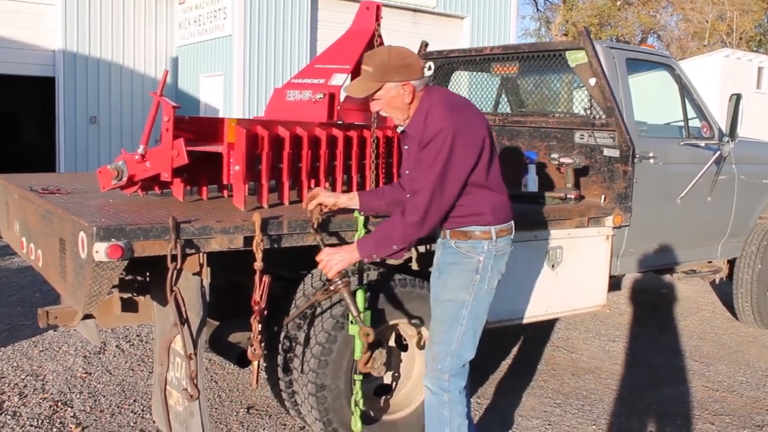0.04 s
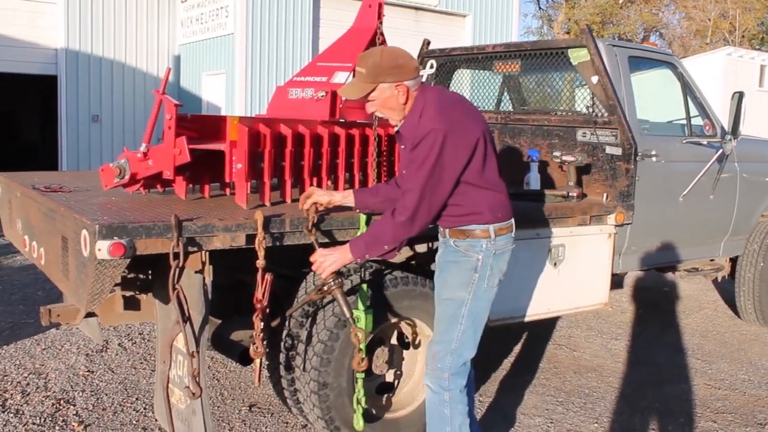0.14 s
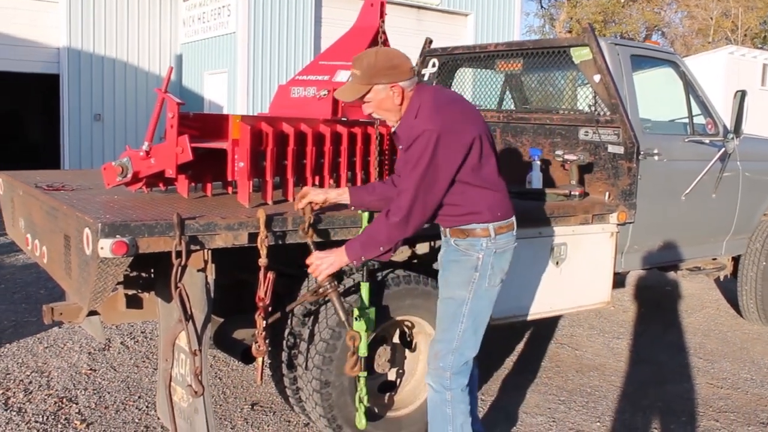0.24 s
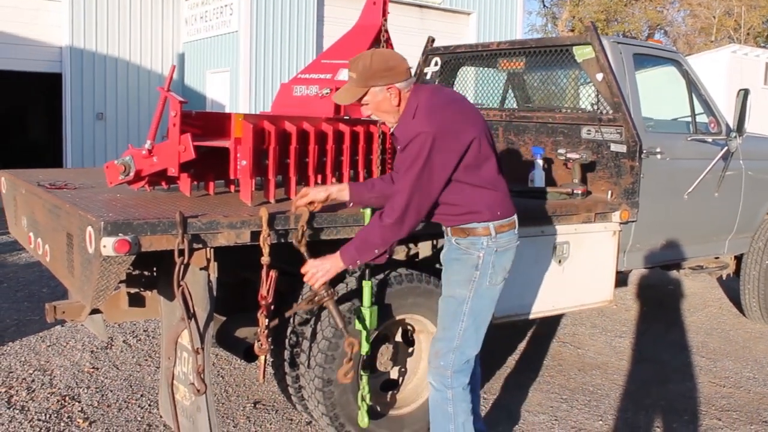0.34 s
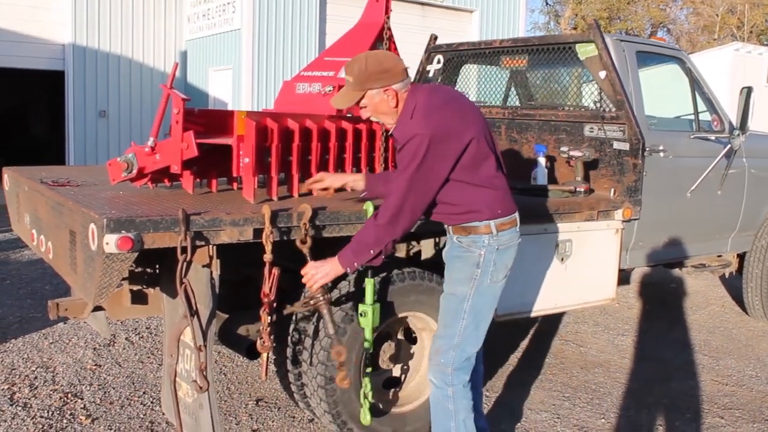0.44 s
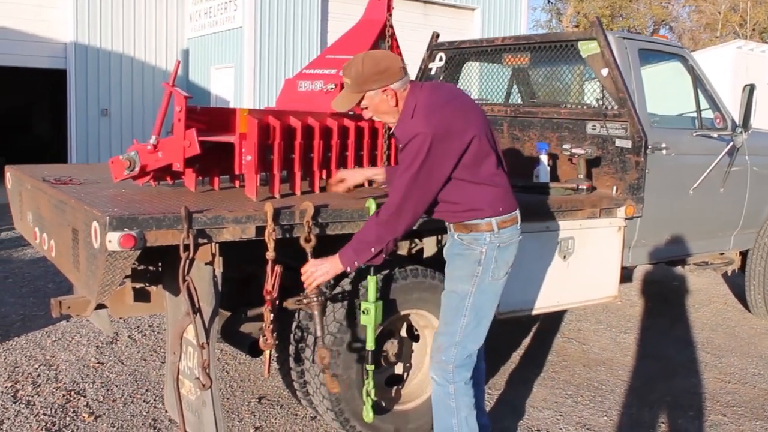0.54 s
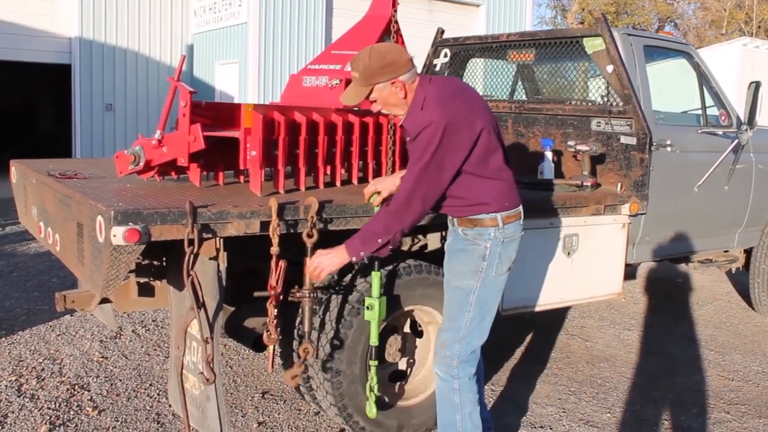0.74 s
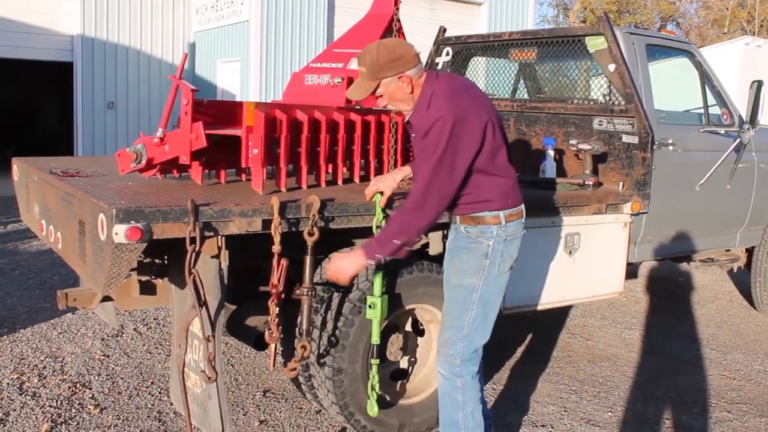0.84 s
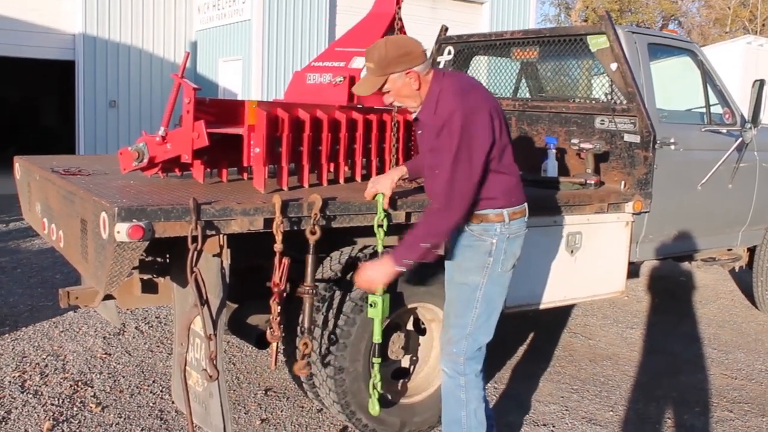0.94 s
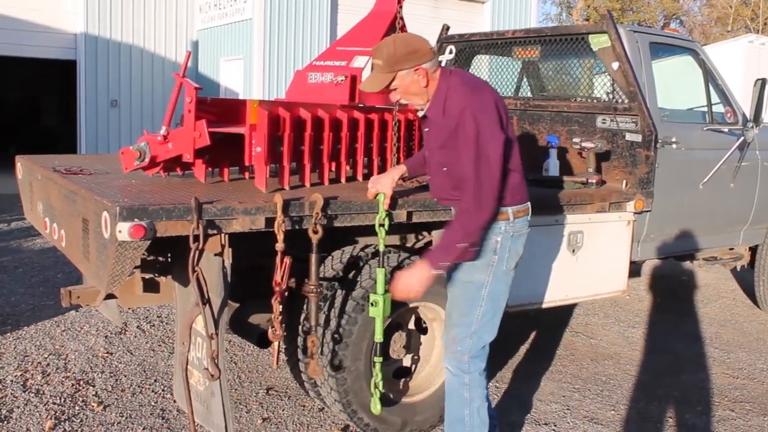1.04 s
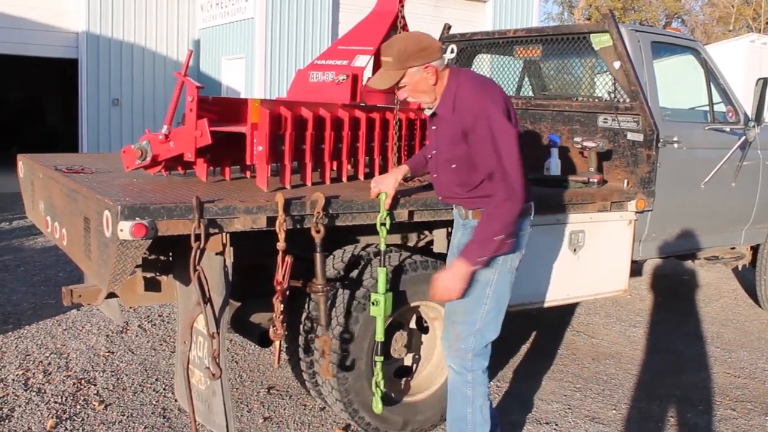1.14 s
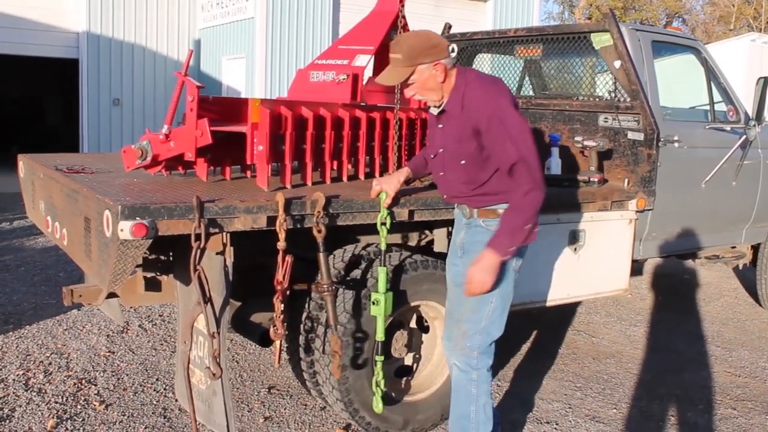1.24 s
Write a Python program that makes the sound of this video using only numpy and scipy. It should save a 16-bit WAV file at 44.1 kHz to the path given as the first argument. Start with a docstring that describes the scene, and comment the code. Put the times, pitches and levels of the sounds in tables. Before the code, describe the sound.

A steel chain slips on the edge of a truck bed with a brief squeak at about 0.2 seconds, then scrapes and clanks over it, loudest around 0.5 seconds, ringing the metal deck and a hook. Single links chime and settle by 0.8 seconds. Near 1.2 seconds the hanging chain swings back with a soft, dull knock. A faint, low outdoor rumble lies underneath.

```python
"""Chain dragged off a flatbed truck

Outdoors, a rusty steel chain sticks and slips on the deck's edge with a squeak, scrapes over it
and clanks down, ringing the deck and its hook. Single links chime as the slack settles, and the
hanging chain swings back once with a dull knock. The truck's frame and a metal shed wall carry
the sound on; a low, distant rumble lies underneath."""
import sys
import numpy as np
from scipy import signal
from scipy.fft import rfft, irfft
from scipy.io import wavfile
from scipy.ndimage import map_coordinates

SR = 44100
rng = np.random.default_rng(int(sys.argv[2]) if len(sys.argv) > 2 else 0)


def log_audio(samples):
    """Write samples as a 16-bit WAV file to the path given in sys.argv[1]."""
    # one column per channel
    frames = np.atleast_2d(samples).T
    # limit to full scale, then quantise
    limited = np.clip(frames, -1, 1)
    pcm = np.round(limited * 32767).astype(np.int16)
    wavfile.write(sys.argv[1], SR, pcm)


N = 57330
T = np.arange(N) / SR
HZ = np.fft.rfftfreq(2 * N, 1 / SR)
BLOW_SAMPLES, ATTACK_S = 20480, 0.00031

# Noise colour of steel contacts. Each row: frequency in Hz, relative density in dB.
CONTACT_SPECTRUM = [(25, -36), (60, -8), (120, -0.5), (230, 2.5), (330, 4.5), (410, -2), (620, 4.5),
                    (800, 1), (1050, 5), (1400, -2.5), (1900, 5), (2500, -1.5), (3300, 0.5), (4600, 2.5),
                    (5800, -3.5), (8000, -3), (10500, -19), (12500, -22.5), (16000, -30)]


def amp(db):
    return 10 ** (np.asarray(db) / 20)


def unit_rms(x):
    return x / np.sqrt(np.mean(x ** 2) + 1e-20)


def at_hz(points, hz):
    """Interpolate (Hz, value) points on a log frequency axis."""
    knots_hz, values = np.transpose(points)
    return np.interp(np.log(hz + 1), np.log(knots_hz + 1), values)


def curves(rows):
    """One value per sample for each column after the time."""
    times_s, *columns = np.transpose(rows)
    return [np.interp(T, times_s, column) for column in columns]


def wobble(knots_per_s):
    """Smooth random curve."""
    return map_coordinates(rng.standard_normal(4096), [T * knots_per_s + 2], mode="wrap")


def filtered(x, gain):
    return irfft(rfft(x, 2 * N) * gain)[:N]


def coloured_noise(spectrum):
    return unit_rms(filtered(rng.standard_normal(N), amp(at_hz(spectrum, HZ))))


def decay(t60_s, t=T):
    return np.exp(-np.log(1000) * t / t60_s)


def decay_by_band(x, t60_points):
    """Each frequency of x dies at its own rate."""
    hz, t, bands = signal.stft(x, SR, nperseg=256)
    bands = bands * decay(at_hz(t60_points, hz)[:, None], t)
    return signal.istft(bands, SR, nperseg=256)[1][:N]


def add(out, start_s, x):
    i = int(round(start_s * SR))
    out[i:i + len(x)] += x[:N - i]


def steel_partials(modes, waver_rad):
    """Decaying modes with slightly unsteady phase, one complex row each."""
    t, knots_s = T[:BLOW_SAMPLES], np.arange(80) / 50
    rows = []
    for hz, db, t60_s in modes:
        drift = waver_rad * np.interp(t, knots_s, rng.standard_normal(len(knots_s)))
        rows.append(amp(db) * decay(t60_s, t) * np.exp(1j * (2 * np.pi * hz * t + drift)))
    return np.array(rows)


def strike(partials, db, scatter_db):
    """One blow excites each mode with scattered level and random phase."""
    gains = amp(db + scatter_db * rng.standard_normal(len(partials)))
    phasors = np.exp(2j * np.pi * rng.random(len(partials)))
    return ((gains * phasors) @ partials).real


def background():
    """Distant rumble with a wavering low hum."""
    # Each row: frequency in Hz, relative density in dB.
    rumble_spectrum = [(15, -53), (25, -24), (64, -18), (87, -1), (123, -7), (157, 2), (195, -13.5),
                       (223, -4.5), (354, -14.5), (451, -13.5), (516, -15), (575, -5), (1260, -11.5),
                       (2410, -28), (2610, -29), (7710, -39.5), (16000, -50)]
    # Each row: time in seconds, level in dB.
    hum_levels = [(0, -59), (.6, -56), (.73, -45), (.82, -51), (1.1, -58), (1.14, -43.5), (1.2, -36.5),
                  (1.25, -44), (1.3, -41)]
    rumble_db, hum_hz = -44, 166.2
    rumble = coloured_noise(rumble_spectrum)
    hum = np.sin(2 * np.pi * hum_hz * T + 1.35 * wobble(29.97))
    hum_db, = curves(hum_levels)
    return amp(rumble_db + .7 * wobble(12.27)) * rumble + amp(hum_db + 2.9 * wobble(29.7)) * hum


def yard_reverb(x):
    """The truck's frame and the metal shed wall carry the sound on."""
    # Each row: frequency in Hz, T60 in seconds.
    tail_t60 = [(100, 1.2), (300, 0.95), (800, 0.77), (2000, .55), (4400, .7), (5600, .45), (12000, 0.31)]
    # Each row: frequency in Hz, gain in dB.
    send = [(60, -8), (180, -1), (330, 1.5), (450, -6), (800, -8.5), (2000, -15.5), (4200, -11.5),
            (6000, -16), (12000, -21)]
    tail = decay_by_band(rng.standard_normal(N), tail_t60) * (1 - np.exp(-T / 0.021))
    energy = SR * at_hz(tail_t60, HZ) / (2 * np.log(1000))
    return filtered(x, rfft(tail, 2 * N) / np.sqrt(energy) * amp(at_hz(send, HZ)))


def squeak():
    """Rusty steel sticks and slips quickly just before the chain lets go."""
    # Each row: time in seconds, slip rate in Hz, level in dB.
    slip = [(.15, 495, -69), (.175, 504.2, -41.5), (.192, 509, -36), (.205, 507, -38.5), (.217, 505, -36.5),
            (.224, 500, -68)]
    # Relative level of each harmonic, fundamental first.
    harmonics_db = [-7, -2, -8, -12.5, -25, -28]
    # Each row: frequency in Hz, relative density in dB.
    rasp_spectrum = [(200, -32), (500, -11), (1100, 4), (1700, -5), (3000, -21), (6000, -43), (16000, -60)]
    rasp_db = -5
    slip_hz, level_db = curves(slip)
    phase = 2 * np.pi * np.cumsum(slip_hz * (1 + .025 * wobble(400))) / SR
    tone = sum(amp(db + 1.2 * wobble(60)) * np.sin(k * phase) for k, db in enumerate(harmonics_db, 1))
    return amp(level_db) * (unit_rms(tone) + amp(rasp_db) * coloured_noise(rasp_spectrum))


def link_ring(modes, scatter_db, waver_rad):
    """A single link, struck once."""
    attack = 1 - np.exp(-T[:BLOW_SAMPLES] / ATTACK_S)
    return strike(steel_partials(modes, waver_rad), 0, scatter_db) * attack


def links():
    """Single links chime when free and tick briefly when pinched or brushed."""
    # Each row: frequency in Hz, relative level in dB, T60 in seconds.
    free_modes = [(5017, 3, 0.089), (5720, -3.5, 0.072), (6750, -6, 0.099), (9200, -23, 0.23),
                  (9730, -18.5, .27), (9860, -15.5, 0.084), (10200, -19, .08), (11360, -32, .3)]
    pinched_modes = [(9530, -4, 0.033), (10530, -2.5, 0.024)]
    # Each row: start in seconds, gain in dB.
    chimes = [(.517, -24.5), (.6165, -37)]
    pinches = [(.461, -26), (0.5, -22)]
    ticks = [(.072, -54), (.113, -56), (.372, -39), (.717, -48.5), (.855, -54)]
    out = np.zeros(N)
    for start_s, db in chimes:
        add(out, start_s, amp(db) * link_ring(free_modes, scatter_db=4, waver_rad=.35))
    for start_s, db in pinches:
        add(out, start_s, amp(db) * link_ring(pinched_modes, scatter_db=1.5, waver_rad=.15))
    for start_s, db in ticks:
        add(out, start_s, amp(db) * decay(t60_s=0.023) * coloured_noise(CONTACT_SPECTRUM))
    return out


def scrape():
    """Rusty links catch on the edge in many tiny jolts and keep the deck ringing."""
    # Each row: time in seconds, level in dB.
    drag_levels = [(.21, -67), (.235, -30), (.28, -36.5), (.335, -31), (.375, -32), (.43, -26.5),
                   (.52, -26.5), (.6, -35.5), (.68, -40.5), (.78, -55.5), (.9, -66)]
    # Each row: frequency in Hz, relative density in dB.
    spectrum = [(60, -37), (300, -6), (450, -2.5), (630, 3), (900, 0), (1250, -4), (1550, -5.5),
                (2400, -9.5), (2750, -11.5), (3200, -18), (4600, -15), (5800, -24.5), (8400, -26.5),
                (9500, -34), (16000, -43)]
    # Each row: centre in Hz, width in Hz, boost in dB.
    deck_resonances = [(572, 27, 2), (632, 22, 6.5), (704, 24, 4), (956, 30, 3), (1422, 33, 7),
                       (1594, 38, 7), (2040, 76, 7.5), (2726, 80, 8.5), (3520, 60, 12), (4530, 95, 4)]
    jolts_per_s, spread_db = 900, 3
    level_db, = curves(drag_levels)
    jolts = (rng.random(N) < jolts_per_s / SR) * amp(spread_db * rng.standard_normal(N))
    power = signal.fftconvolve(jolts ** 2, decay(t60_s=.02) ** 2)[:N]
    grains = np.sqrt(np.abs(power)) * rng.standard_normal(N)
    deck_gain = 1 + sum((amp(db) - 1) * 1j * HZ * width_hz / (hz ** 2 - HZ ** 2 + 1j * HZ * width_hz)
                        for hz, width_hz, db in deck_resonances)
    return amp(level_db) * unit_rms(filtered(grains, deck_gain * amp(at_hz(spectrum, HZ))))


def clanks():
    """Each blow on the deck: a crack, a dense clash of many links, and the ring of deck and hook."""
    # Each row: start in seconds, then gains in dB: thump, body, clash and sizzle zones,
    # crack relative to the clash, deck ring, hook ring. The last four rows are the soft swing back.
    blows = [(.219, -42, -31.5, -19, -28.5, 5.5, -34.5, -65), (0.2276, -48, -22, -25, -43, 5, -34, -56),
             (.2995, -44, -20.5, -55, -64, 19, -40, -65), (.385, -45, -29.5, -20.5, -34, -2.5, -30.5, -62),
             (0.4291, -41, -23.5, -24.5, -37.5, -4, -44, -64),
             (0.4407, -36, -26.5, -22, -28, 2, -42.5, -47), (.4485, -43, -24, -16.5, -31, -10, -44.5, -42),
             (.461, -28.5, -28, -12, -15.5, 8, -37, -23), (.486, -22, -25.5, -16, -30.5, -8, -40, -32),
             (0.5002, -19, -23, -18.5, -24, -3, -38, -31.5), (.516, -33.5, -19, -19, -33, -6, -41.5, -27.5),
             (.569, -25.5, -29, -30, -44, -1, -46, -46), (.618, -28.5, -24, -24.5, -44, -9, -46.5, -52),
             (.668, -26, -34, -48, -71, -6, -49.5, -68), (1.174, -31.5, -26, -38.5, -66, -9, -39.5, -75),
             (1.198, -37.5, -28, -42.5, -70, -2, -50, -73), (1.216, -38, -24.5, -50, -81, -8, -40, -78),
             (1.277, -37, -42, -63, -78, -11, -54, -77)]
    # Frequencies of the four zones.
    zones_hz = [200, 700, 2800, 9000]
    # Each row: frequency in Hz, T60 in seconds.
    clash_t60 = [(100, 0.34), (300, 0.53), (700, 0.32), (2000, 0.2), (4500, 0.19), (8000, 0.086),
                 (15000, 0.11)]
    # Each row: frequency in Hz, relative level in dB, T60 in seconds.
    deck_modes = [(336.3, -10.5, .7), (509.9, -4, 0.37), (577, 0, 0.48), (632, 1.5, 0.22), (701, 0, 0.24),
                  (955.6, -4.5, .4), (1425, -5, 0.46), (1583, -4, 0.25), (2067, -3, 0.31), (2122, -3, 0.29),
                  (2696, -3, 0.24), (3534, -1.5, 0.19), (4195, -3, .15)]
    hook_modes = [(217.4, -10, .7), (262, -13, .5), (900, -8, 0.36), (1000, -7.5, 0.42), (1060, -1.5, 0.41),
                  (1257, -6.5, 0.51), (1691, -1.5, 0.17), (1840, -9, 0.18), (1879, -3, .25), (1914, -3, .2),
                  (2433, -2.5, 0.18), (2740, -8, 0.28), (3070, -10, .2), (3215, -4, 0.14), (3277, 0, 0.16),
                  (4158, -10, 0.28), (4315, -15, 0.3)]
    out, t, hz = np.zeros(N), T[:BLOW_SAMPLES], np.fft.rfftfreq(BLOW_SAMPLES, 1 / SR)
    colour = unit_rms(amp(at_hz(CONTACT_SPECTRUM, hz)))
    deck = steel_partials(deck_modes, waver_rad=0.33)
    hook = steel_partials(hook_modes, waver_rad=0.25)
    window = (1 - np.exp(-t / ATTACK_S)) * np.minimum(1, 10 * (t[-1] - t))
    for start_s, *zones_db, crack_db, deck_db, hook_db in blows:
        zones = list(zip(zones_hz, zones_db))
        spectra = rfft(rng.standard_normal((2, BLOW_SAMPLES))) * colour * amp(at_hz(zones, hz))
        clash = decay_by_band(irfft(spectra[0]), clash_t60)[:BLOW_SAMPLES]
        crack = irfft(spectra[1] * hz / (hz + 1000)) * amp(crack_db) * decay(t60_s=0.013, t=t)
        # Dull blows spare the deck's high modes.
        dull_db = np.minimum(0, at_hz(zones[1:], np.array(deck_modes)[:, 0]) - zones_db[1])
        deck_ring = strike(deck, deck_db + dull_db, scatter_db=2.5)
        hook_ring = strike(hook, hook_db, scatter_db=2.0)
        add(out, start_s, window * (clash + crack + deck_ring + hook_ring))
    return out


def scene():
    chain = clanks() + scrape()
    small_sounds = links() + squeak()
    small_send_db = -7.5
    reverb = yard_reverb(chain + amp(small_send_db) * small_sounds)
    return (chain + small_sounds + reverb + background())[None]


def record(dry):
    """Brick-wall low-pass."""
    cutoff_hz = 16300
    return filtered(dry[0], HZ < cutoff_hz)[None]


dry = scene()
out = record(dry)
log_audio(out)
```